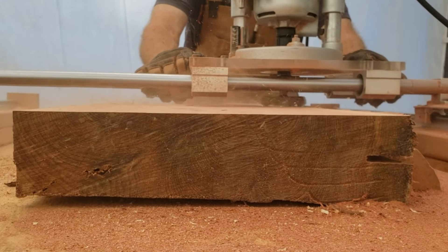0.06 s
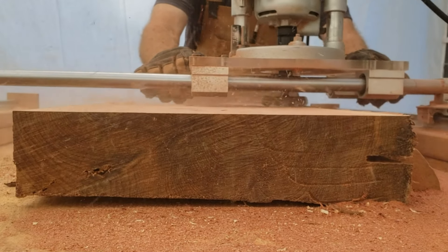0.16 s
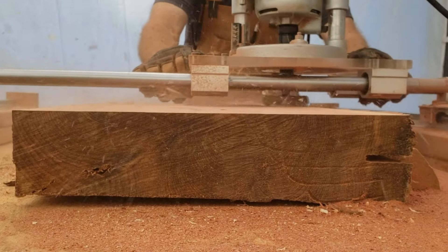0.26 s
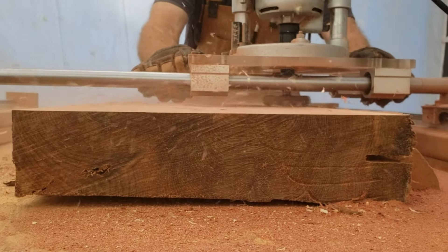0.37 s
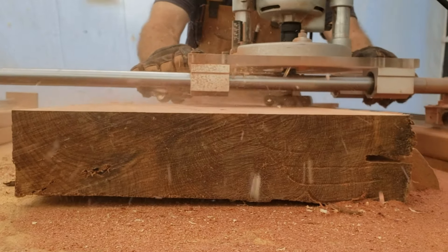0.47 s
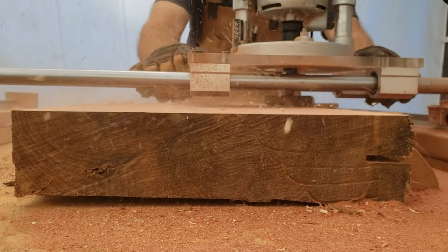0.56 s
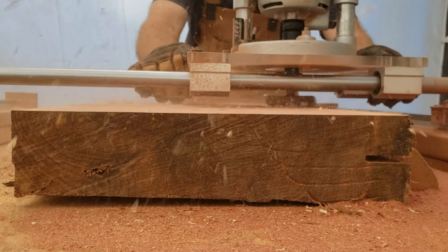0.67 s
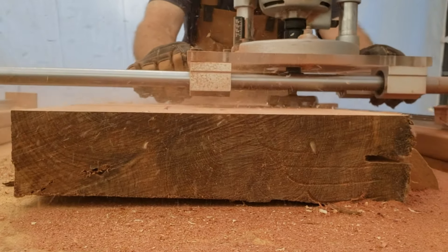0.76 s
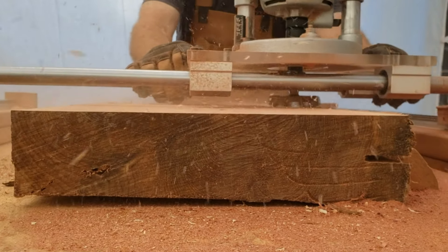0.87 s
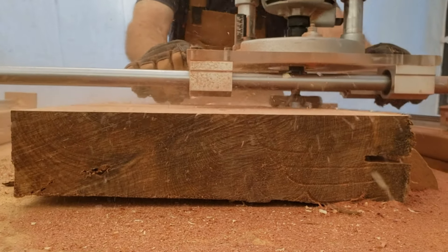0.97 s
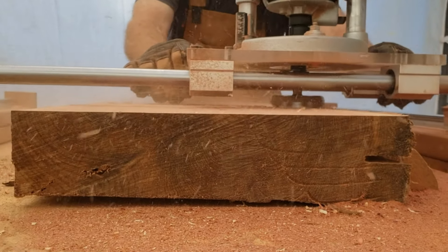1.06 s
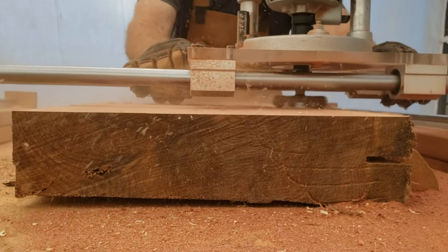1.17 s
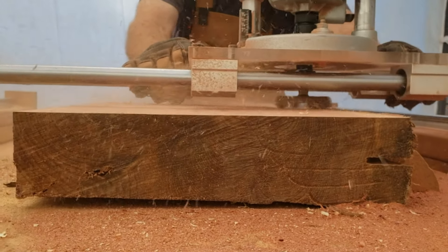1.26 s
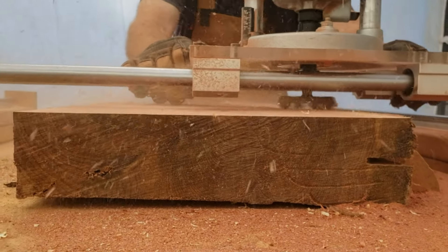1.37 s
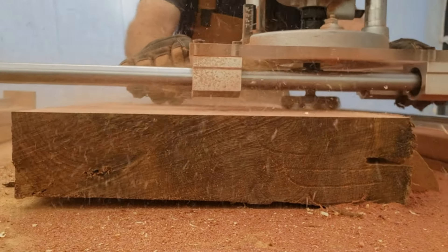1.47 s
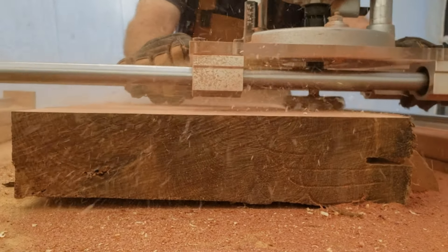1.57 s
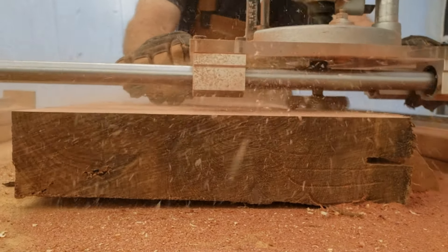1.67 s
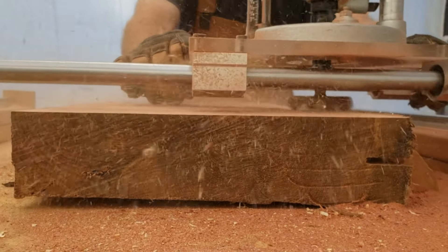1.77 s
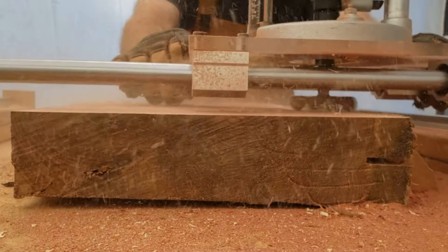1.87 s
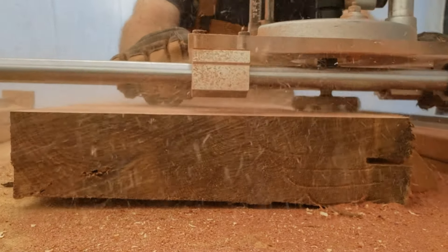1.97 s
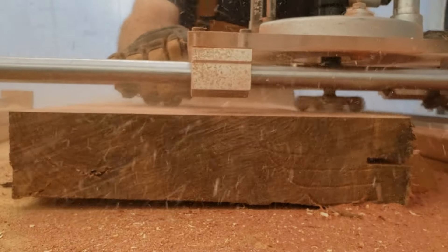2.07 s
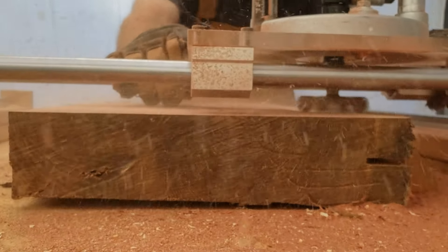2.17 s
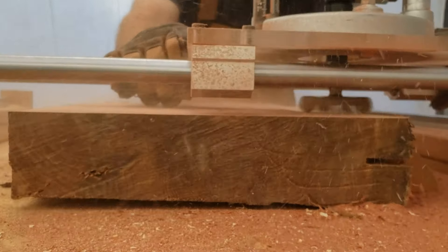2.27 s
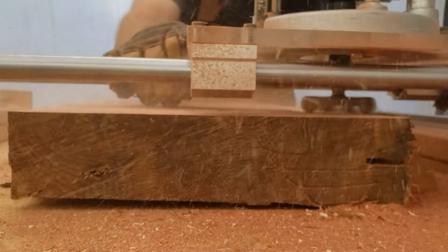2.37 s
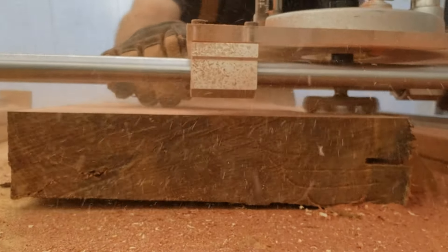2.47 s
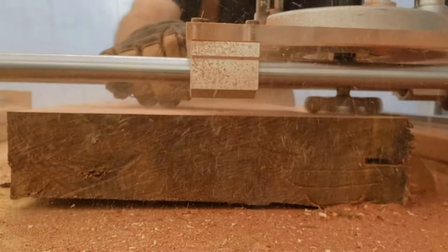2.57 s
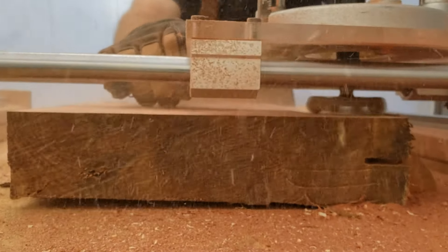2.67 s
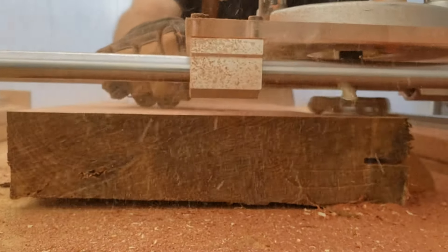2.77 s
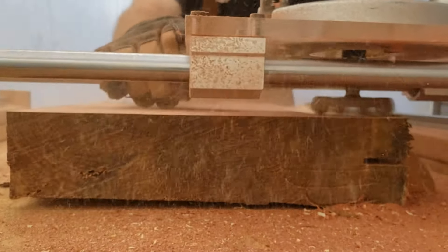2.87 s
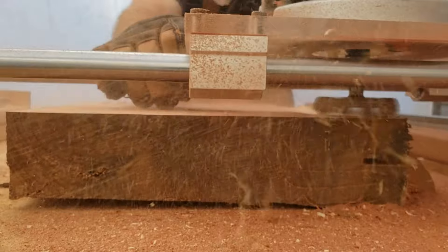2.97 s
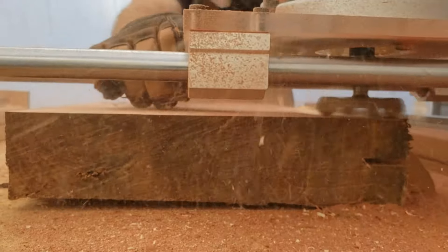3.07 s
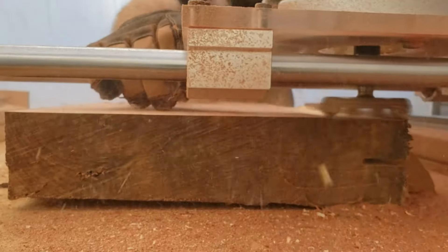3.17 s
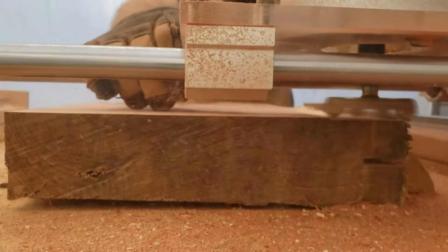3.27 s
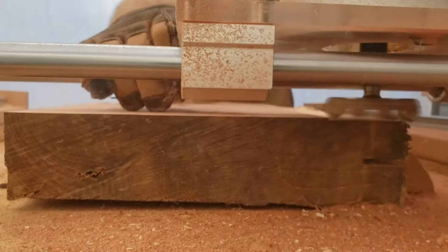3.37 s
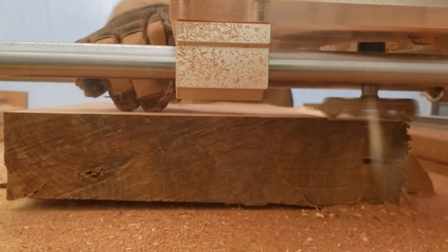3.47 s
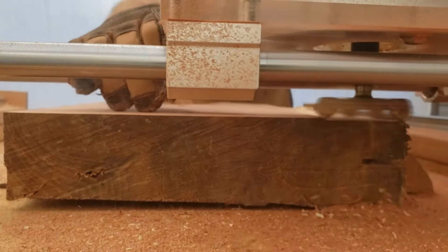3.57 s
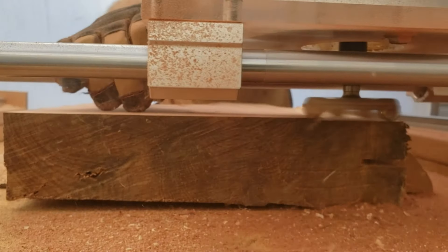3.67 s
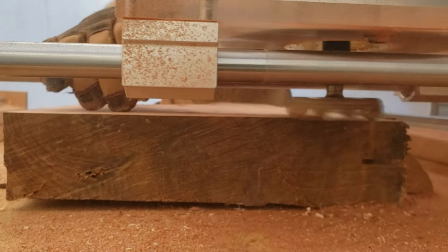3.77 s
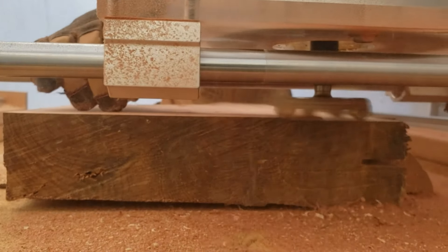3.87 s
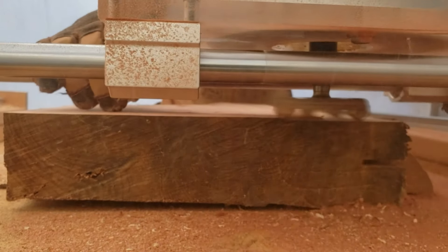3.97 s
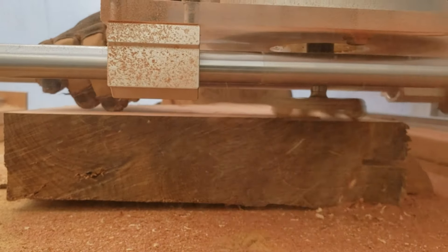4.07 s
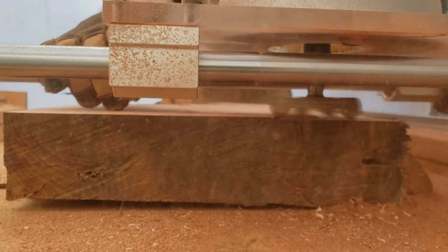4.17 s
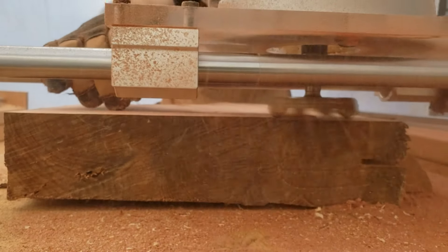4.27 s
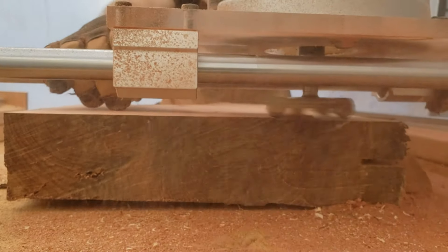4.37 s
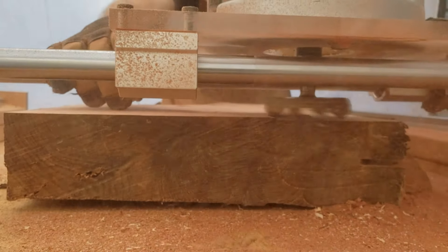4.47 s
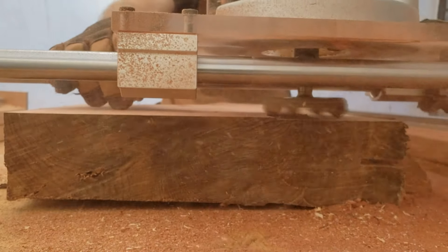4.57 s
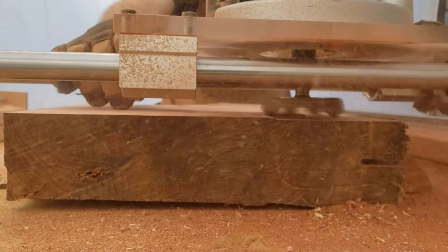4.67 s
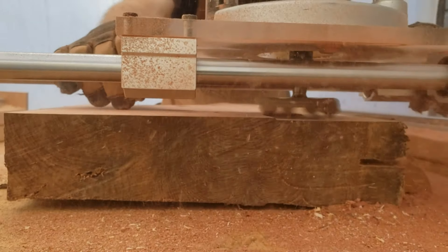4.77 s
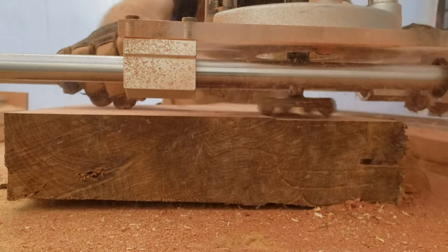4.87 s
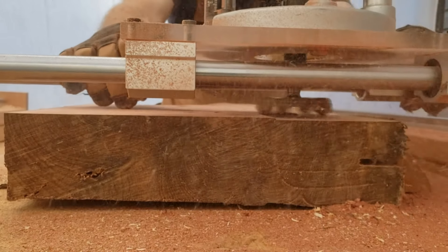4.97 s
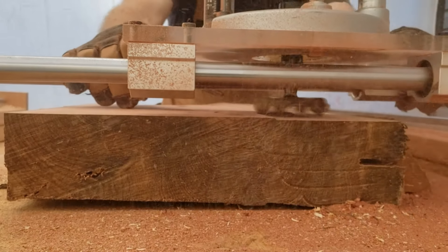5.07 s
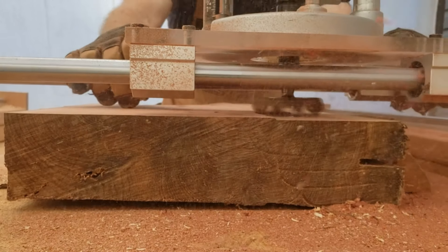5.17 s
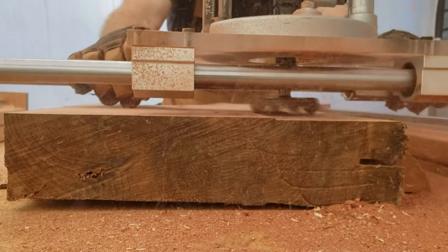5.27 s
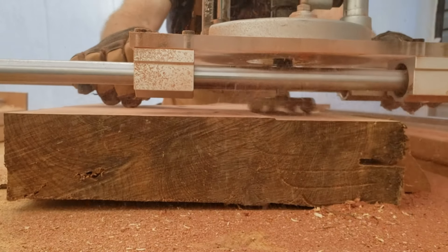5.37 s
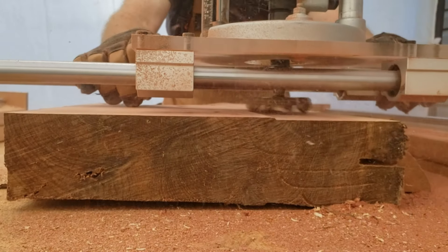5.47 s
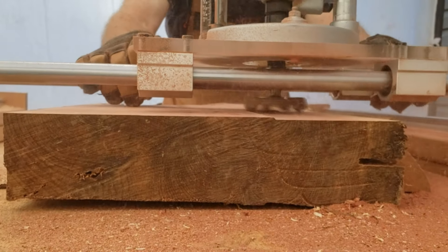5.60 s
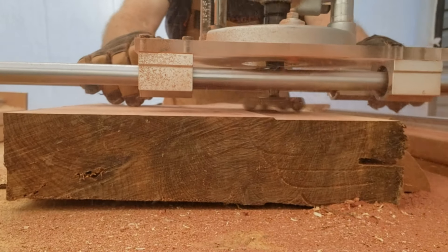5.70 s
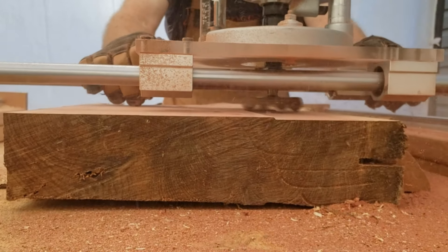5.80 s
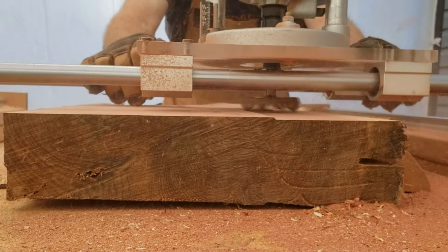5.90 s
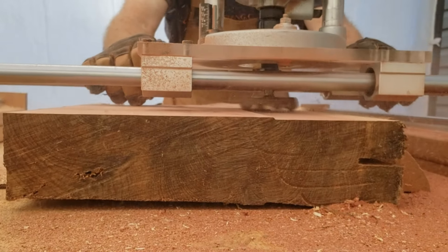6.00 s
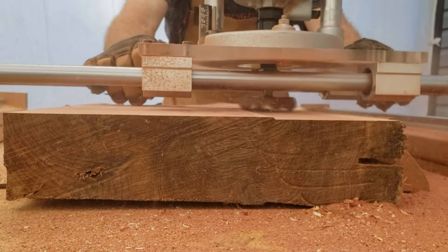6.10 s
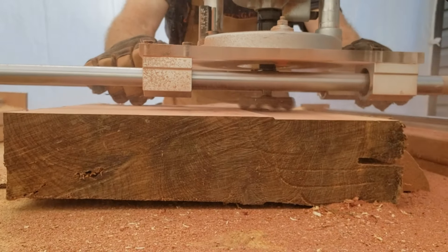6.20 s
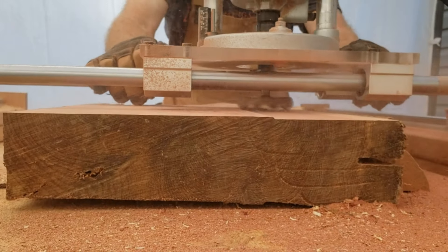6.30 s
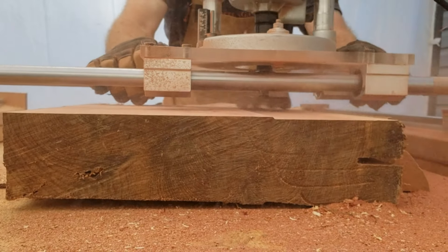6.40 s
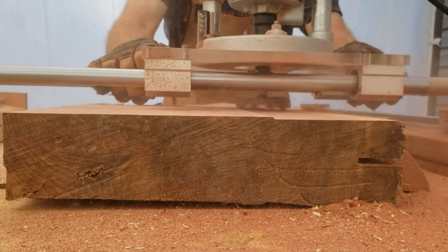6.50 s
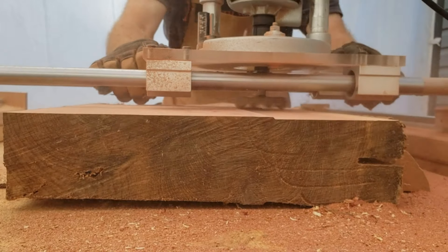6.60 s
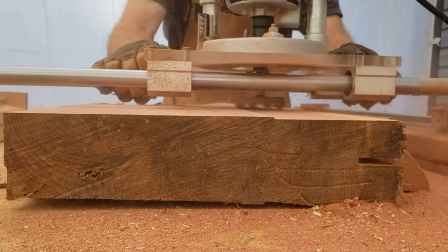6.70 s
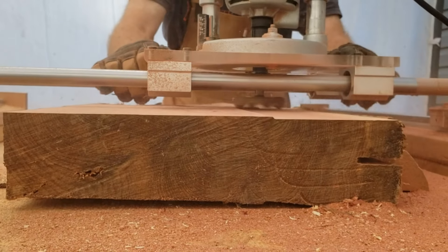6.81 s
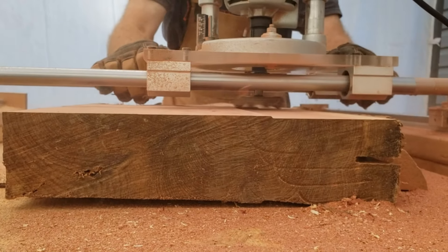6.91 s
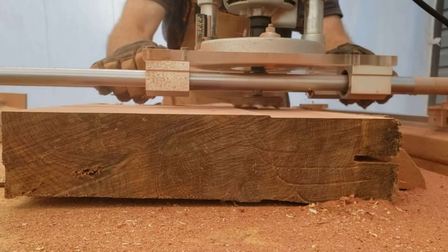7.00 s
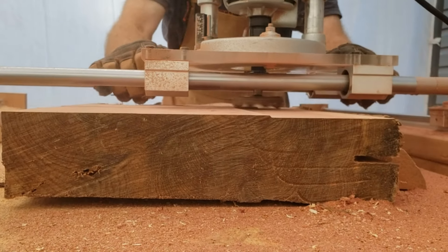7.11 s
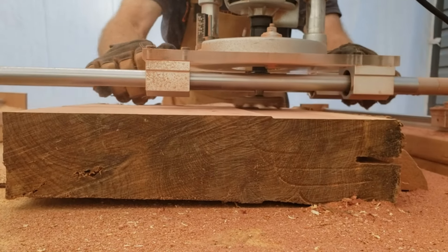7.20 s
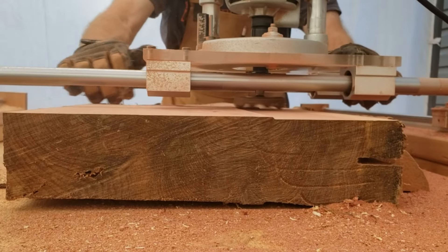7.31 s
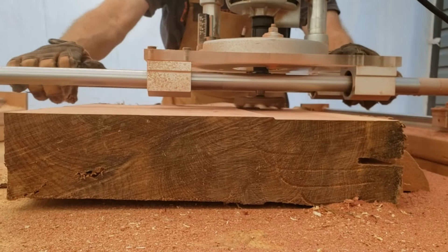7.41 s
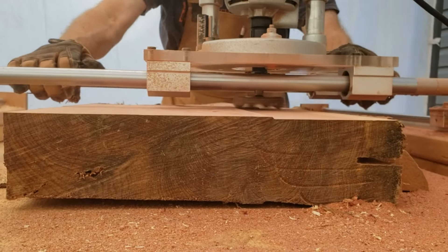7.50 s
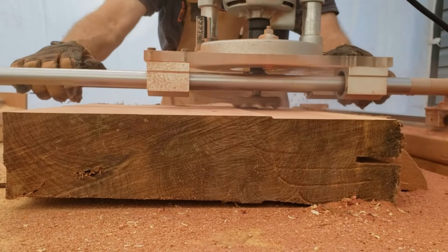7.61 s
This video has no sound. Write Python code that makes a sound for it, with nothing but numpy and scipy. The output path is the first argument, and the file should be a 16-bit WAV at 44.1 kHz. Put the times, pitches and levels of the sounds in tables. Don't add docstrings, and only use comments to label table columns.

```python
import sys
import numpy as np
from scipy import signal
from scipy.fft import rfft, irfft, next_fast_len
from scipy.io import wavfile
from scipy.ndimage import uniform_filter1d

SR = 44100
rng = np.random.default_rng(int(sys.argv[2]) if len(sys.argv) > 2 else 0)


def generate_wav(sig):
    pcm = np.round(np.clip(np.atleast_2d(sig).T, -1, 1) * 32767).astype(np.int16)
    wavfile.write(sys.argv[1], SR, pcm)


def undo_db(level):
    steps = np.asarray(level, float) / 20
    return 10 ** steps


N = 337365

# t/s, turns f/Hz
SHAFT_SPEED = [(0, 249.7), (.23, 251.4), (.4, 247.8), (1.3, 247.7), (1.73, 231), (1.92, 230.7),
               (2.73, 244.2), (3.09, 243.9), (3.49, 296.5), (3.68, 310.5), (4.07, 307), (4.33, 301.1),
               (5.55, 284.1), (6.32, 294.2), (6.6, 282), (6.79, 285), (7.18, 311.3), (7.65, 312.2)]
# t/s, nearness as motor air level/dB, depth of bite level/dB, rail shake level/dB
SLED_TRAVEL = [(0, -31.5, -32, -25), (.3, -30, -32, -25.5), (.45, -30.5, -27, -28),
               (1.35, -31.5, -25.5, -27.5), (1.6, -29.5, -26.5, -33.5), (2.4, -31.5, -25, -29.5),
               (2.8, -31, -24.5, -27), (3.1, -29.5, -26, -27.5), (3.4, -30, -34, -30),
               (3.7, -31.5, -30.5, -26.5), (4.7, -34.5, -38, -28.5), (5.5, -36, -35, -43),
               (5.57, -38.5, -40.5, -49), (6.4, -37, -39.5, -46.5), (6.65, -36, -39, -32),
               (6.9, -34.5, -36.5, -44.5), (7.05, -32, -43.5, -27.5), (7.65, -29.5, -38, -26)]
# t/s, fan left-right/dB, teeth left-right/dB, housing ring level/dB
STEREO_LEAN = [(0, 7.5, -22, -1), (.7, -3, -16, -7), (1.5, -11, -14, -7), (2.5, 1, -1.5, -11),
               (4, -19, -4.5, -18), (5.2, -24, -7, -2.5), (6.3, -13, 1, 0), (7.65, -13, -13, 5.5)]

# t/s, peak level/dB, f/Hz
RAIL_KNOCKS = [(5.652, -28, 110), (6.036, -26, 80), (6.092, -30, 90.2), (6.129, -25, 100.6),
               (6.161, -21.5, 150), (6.186, -26, 120), (6.269, -19, 133), (6.508, -20, 75),
               (6.524, -22, 101), (6.59, -29, 110), (6.822, -25, 100), (6.859, -28, 90.1), (7.035, -31, 80),
               (7.218, -23, 129.8), (7.252, -28, 70), (7.401, -26, 110), (7.524, -23, 89.7),
               (7.565, -29, 70.5)]
# t/s, left level/dB, right level/dB
AIR_STREAM = [(0, -30.5, -29), (.5, -32, -25), (1.0, -26.5, -21.5), (1.6, -21, -29), (2.3, -17, -27.5),
              (2.7, -16.5, -43), (3.2, -12, -37), (3.5, -8, -55), (3.75, -14, -43), (4.2, -14.5, -40),
              (4.9, -19, -37.5), (5.3, -26.5, -29), (5.5, -26.5, -28), (5.8, -43, -36), (6.1, -35.5, -36),
              (7.65, -33, -34.5)]
# t/s, left level/dB, right level/dB
EDDIES = [(.14, 4, 3), (.29, -4, 10.5), (.34, 7, 0), (.63, 7, -11), (.84, 6, 2), (1.14, -6, 5.5),
          (1.4, 7.5, 8), (1.69, 6.5, -2), (1.75, -1, 7), (1.929, 2, -1), (2.27, 3.5, 14), (2.55, 5, 4),
          (2.84, -1, 0), (3.95, 3.5, 11), (4.07, 2.5, 0), (4.44, -6.5, 0), (4.57, 3.5, 5), (4.8, 1.5, 6),
          (5.18, 3.5, 8.5), (5.41, 7, 7), (6.15, 3, 6), (6.5, 3, 4)]
# f/Hz, level/dB per Hz
BUFFET_SPECTRUM = [(18, -24), (30, -28), (45, -3.5), (65, -1), (90, -2), (130, -5.5), (190, -10),
                   (390, -19.5), (800, -33)]

# f/Hz, level/dB per Hz
TEARING_SPECTRUM = [(180, -29), (300, -1), (480, -3.5), (800, -1.5), (1660, 8.5), (2600, 6), (4000, 1),
                    (7000, -30)]
# f/Hz, level/dB per Hz
AIR_SPECTRUM = [(120, -56), (200, -3), (470, -7), (1100, -2.5), (2000, -4), (3000, -6), (4200, -3.5),
                (5400, -5), (6500, -7.5), (7300, -13), (8300, -21.5), (11000, -41)]
# f/Hz, level/dB per Hz
SPRAY_SPECTRUM = [(4410, -59), (7500, -40), (8300, -15), (9010, -5), (12000, 5), (13700, -1), (15200, 0),
                  (16000, 3)]
# f/Hz, width/Hz, level/dB
HOUSING_RINGS = [
    (2950, 243, 4),
    (1710, 720, -16),
]
# t/s, half length/s, spray level/dB, tearing level/dB
CHIP_BURSTS = [
    (0.406, 0.034, 2, -3),
    (.68, .04, 4, -9),
    (1.535, .1, 2, -9),
    (3.05, 0.08, 9, 0),
    (3.11, 0.017, -4, 8),
    (3.32, 0.021, 4, 7),
]

# multiple, level/dB, left-right/dB
UNEVEN_TEETH = [(3, 0, -7), (5, 0, -5.5), (6, -7, -12.5), (7, 0.5, -9), (9, -2, -7), (10, -7, -6),
                (11, -7, -12.5), (13, -32, -2), (14, -5, 4)]
# multiple, level/dB, left-right/dB
TOOTH_OVERTONES = [(8, -1.5, -10.5), (16, -9.5, 4.5)]
# f/Hz, level/dB
EDGE_COLOUR = [(4600, -5), (6200, 4), (7400, -12), (8700, -12.5), (9900, -12), (11000, 2), (12100, 0),
               (15000, 0)]
# multiple, level/dB, left-right/dB
FAN_LINES = [(25, 4.5, 6.5), (27, -59, 9), (29, -40, -4)]
# t/s, tooth pass level/dB, overtone level/dB
TOOTH_SONG = [(0, -37.5, -32), (.65, -33.5, -32.5), (1.2, -31.5, -36), (1.8, -36, -27), (2.4, -26, -36),
              (3.1, -33, -29), (3.17, -21, -27.5), (3.6, -20, -22), (3.8, -15.5, -24.5), (4.22, -16, -19.5),
              (4.5, -16.5, -32), (4.76, -44, -48), (5.9, -43, -53), (6.44, -32.5, -57), (6.6, -34.5, -52),
              (7.1, -40, -42), (7.4, -32.5, -50), (7.65, -39, -45)]
# turns f/Hz, twice-a-turn level/dB, fan level/dB, fan octave level/dB
SPEED_RESONANCES = [(231, -7, -3, -25), (239.7, -12, -3, -14), (247, -2.5, -2.5, -4),
                    (251.3, 0.5, -1.5, -16), (258, -16, -7.5, -26), (290.7, -15, -9.5, -14),
                    (285.3, -19.5, -10.5, -23), (303, -13.5, -14.5, -22), (314, -19.5, -21, -17)]

# t/s, level/dB
PASS_NULLS = [
    (.42, -5),
    (.9, -22),
    (1.54, -9),
    (2.07, -17),
    (3.0, -4),
    (4.31, -12),
    (6.64, -8),
    (6.85, -1),
    (7.05, -6),
]
# t/s, half length/s, level/dB
FAN_ECHOES = [(0.425, 0.066, 1.5), (0.76, 0.29, 7.5), (1.13, 0.12, -3), (1.5, 0.19, -7), (2.91, 0.21, -6),
              (3.1, 0.048, 4), (5.03, 0.073, -9), (5.848, 0.11, 6), (6.007, .05, -8), (6.155, 0.11, 6.5),
              (6.3, 0.046, -6), (6.44, .06, 2), (7.299, .08, 11), (7.56, .06, -17)]
# t/s, half length/s, level/dB
OVERTONE_ECHOES = [
    (.7, 0.074, 0),
    (1.88, 0.2, 5.5),
    (2.38, .1, -1),
    (3.15, 0.052, 4.5),
    (3.39, 0.074, -7),
    (4.2, 0.088, -11),
    (7.14, .06, 16),
]
# t/s, half length/s, level/dB
EDGE_ECHOES = [
    (.1, .15, -5),
    (.42, .05, 10),
    (.64, 0.13, 12),
    (1.05, .2, 5),
    (3.1, 0.073, 7),
    (3.9, 0.43, 2),
    (6.3, 0.93, -6),
    (7.35, .15, 0),
]
# t/s, half length/s, level/dB
FLARE_ECHOES = [
    (1.5, 0.36, -4),
    (2.4, 0.45, -8),
    (3.3, 0.25, 5.5),
    (3.75, 0.084, 2),
    (4.22, .1, 13.5),
    (5.8, 0.69, -8),
]
# t/s, half length/s, level/dB
SHAKE_ECHOES = [
    (1.5, .06, 0),
    (2.8, 0.085, 2.5),
    (2.95, .06, -2),
    (3.2, 0.078, -1.5),
    (6.18, 0.13, 7.5),
]
# t/s, half length/s, level/dB
BITE_ECHOES = [
    (1.4, 0.1, 3),
    (2.35, 0.18, 2.5),
    (3.36, .06, -6),
    (5.6, .4, -4.5),
    (6.9, 0.091, 3.5),
]
# t/s, half length/s, level/dB
FAN_OCTAVE_SWELL = (7.7, .25, 6)

RIGHT_LAG = 5


def rms_one(x):
    return x / np.sqrt(np.mean(x ** 2, axis=-1, keepdims=True) + 1e-20)


def in_time(rows):
    s, *columns = np.transpose(rows)
    return [np.interp(np.arange(N) / SR, s, c) for c in columns]


def sides(pan_db):
    return undo_db(np.array([[.5], [-.5]]) * pan_db)


def swells(s, half_s, db):
    t = np.arange(N) / SR
    return sum(d * np.exp(-((t - a) / h) ** 2) for a, h, d in np.broadcast(s, half_s, db))


def drift(rate, channels=1):
    r = np.exp(-80 * np.pi * rate / SR)
    white = rng.standard_normal((channels, N // 40 + 2002))
    slow = signal.lfilter([1], [1, -2 * r, r * r], white)[:, 2000:]
    return np.array([np.interp(np.arange(N) / 40, np.arange(len(s)), s) for s in rms_one(slow)])


def coloured(white, spectrum):
    size = next_fast_len(N)
    hz, db = np.transpose(spectrum)
    bins_hz = np.arange(size // 2 + 1) * SR / size
    shape = np.interp(np.log(bins_hz + 1), np.log(hz), db, left=-90, right=-90)
    return rms_one(irfft(rfft(white, size) * undo_db(shape), size)[:, :N])


def stereo_noise(shared):
    common, own = rng.standard_normal(N), rng.standard_normal((2, N))
    both = np.array([common, np.roll(common, RIGHT_LAG)])
    return np.sqrt(shared) * both + np.sqrt(1 - shared) * own


def knocks():
    out = np.zeros(N)
    for s, db, hz in RAIL_KNOCKS:
        cycles = (np.arange(N) / SR - s) * hz
        bell = np.exp(-(cycles / 0.51) ** 2)
        out += undo_db(db + 1) * bell * np.cos(2 * np.pi * cycles)
    return out


def blast():
    s, *gust_db = np.transpose(EDDIES)
    level_db = np.array(in_time(AIR_STREAM)) + [swells(s, 0.044, db) for db in gust_db]
    lumps = undo_db(4.0 * drift(43.0, channels=2) + 1.0 * drift(28, channels=2))
    push = undo_db(level_db) * coloured(lumps * stereo_noise(0), BUFFET_SPECTRUM)
    return .95 * np.tanh(push / .95)


def housing(x):
    out = 0
    for hz, width_hz, db in HOUSING_RINGS:
        r = np.exp(-np.pi * width_hz / SR)
        poles = [1, -2 * r * np.cos(2 * np.pi * hz / SR), r * r]
        out = out + undo_db(db) * signal.lfilter([(1 - r * r) / 2, 0, (r * r - 1) / 2], poles, x)
    return out


def hiss(turns):
    air_db, bite_db, _ = in_time(SLED_TRAVEL)
    _, teeth_pan_db, ring_db = in_time(STEREO_LEAN)
    s, half_s, chips_db, ridge_db = np.transpose(CHIP_BURSTS)
    beat = 1 + .25 * np.cos(2 * np.pi * turns) + .3 * np.cos(2 * np.pi * 4 * turns)

    tearing_db = -34.5 + 0.29 * (in_time(AIR_STREAM)[0] + 20) + 0.15 * (air_db + 33)
    tearing_db = tearing_db + swells(s, half_s, ridge_db) + 0.49 * drift(36)
    tearing = undo_db(tearing_db) * sides(teeth_pan_db) * coloured(beat * stereo_noise(0.87), TEARING_SPECTRUM)

    flow = coloured(stereo_noise(0.19), AIR_SPECTRUM)
    air = undo_db(air_db + 6.0 + 1.0 * drift(55.0)) * (flow + undo_db(ring_db) * housing(flow))

    spray_db = air_db - .3 + 0.2 * (bite_db + 21.5) + swells(s, half_s, chips_db) + 0.79 * drift(42)
    spray = undo_db(spray_db) * coloured(beat * stereo_noise(0.065), SPRAY_SPECTRUM)
    return tearing + air + spray


def multiples(turns, speed, orders, level_db, fade_db, wander, lag=RIGHT_LAG):
    out = np.zeros((2, N))
    lag = np.interp(np.arange(N) / SR, [4, 7.6], [1.1, .3]) * lag
    for multiple, db, pan_db in orders:
        phase = 2 * np.pi * round(multiple) * np.array([turns, turns - speed * lag / SR])
        phase += rng.uniform(0, 2 * np.pi) + wander * (drift(5, channels=2) + .7 * drift(45))
        fade = fade_db * (drift(3.7, channels=2) + 1.24 * drift(13.0))
        out += np.sqrt(2) * undo_db(db + fade) * sides(pan_db) * np.sin(phase)
    return undo_db(level_db) * out


def motor_whine(turns, speed):
    air_db, _, shake_db = in_time(SLED_TRAVEL)
    fan_pan_db = in_time(STEREO_LEAN)[0]
    hz, *favours = np.transpose(SPEED_RESONANCES)
    oval_db, fan_db, octave_db = (air_db + np.interp(speed, hz, f) for f in favours)
    shake_db = shake_db + swells(*np.transpose(SHAKE_ECHOES))
    fan_db = fan_db + swells(*np.transpose(FAN_ECHOES))
    octave_db = octave_db + swells(*FAN_OCTAVE_SWELL)

    shake = multiples(turns, speed, [(1, 0, -1.6)], shake_db, fade_db=0.8, wander=0.059)
    oval = multiples(turns, speed, [(2, 0, -1.7)], oval_db, fade_db=-0.5, wander=0.039)
    fan = multiples(turns, speed, FAN_LINES, fan_db, fade_db=2.12, wander=.55, lag=0) * sides(fan_pan_db)
    octave = multiples(turns, speed, [(50, 0, 0)], octave_db, fade_db=2.5, wander=0.7, lag=1)
    return shake + oval + fan + octave


def tooth_song(turns, speed):
    air_db, bite_db, _ = in_time(SLED_TRAVEL)
    pass_db, overtone_db = in_time(TOOTH_SONG)
    teeth_pan_db = in_time(STEREO_LEAN)[1]
    null_s, null_db = np.transpose(PASS_NULLS)
    pass_db = pass_db + swells(null_s, 0.07, null_db)
    uneven_db = bite_db - 10 + swells(*np.transpose(BITE_ECHOES))
    overtone_db = overtone_db - 6.5 + swells(*np.transpose(OVERTONE_ECHOES))
    flare_db = -39.5 + 0.55 * (bite_db + 25.5) + swells(*np.transpose(FLARE_ECHOES))
    edge_db = -48.5 + 1.5 * (air_db + 33) + swells(*np.transpose(EDGE_ECHOES))
    edge_lines = [(m, np.interp(m * speed, *np.transpose(EDGE_COLOUR)), 0) for m in range(20, 61, 4)]

    tooth_pass = multiples(turns, speed, [(4, 0, 0)], pass_db, fade_db=0.56, wander=0.28)
    uneven = multiples(turns, speed, UNEVEN_TEETH, uneven_db, fade_db=1.5, wander=0.17)
    overtones = multiples(turns, speed, TOOTH_OVERTONES, overtone_db, fade_db=1.8, wander=.25, lag=2.6)
    flare = multiples(turns, speed, [(12, 0, -4.5)], flare_db, fade_db=2.0, wander=.25, lag=1)
    edge = multiples(turns, speed, edge_lines, edge_db, fade_db=2.5, wander=0.93, lag=1)
    return tooth_pass * sides(teeth_pan_db) + uneven + overtones + flare + edge


def scene():
    speed = uniform_filter1d(in_time(SHAFT_SPEED)[0], size=5000, mode="nearest")
    turns = np.cumsum(speed) / SR
    return knocks() + blast() + hiss(turns) + motor_whine(turns, speed) + tooth_song(turns, speed)


def top_cut(x):
    return signal.sosfilt(signal.butter(12, 17090, fs=SR, output="sos"), x)


def record(dry):
    low_pass = signal.ellip(12, .3, 70, 15800, fs=SR, output="sos")
    cut = signal.sosfilt(low_pass, dry)
    return top_cut(np.clip(cut, -1, 1))


dry = scene()
out = record(dry)
generate_wav(out)
```